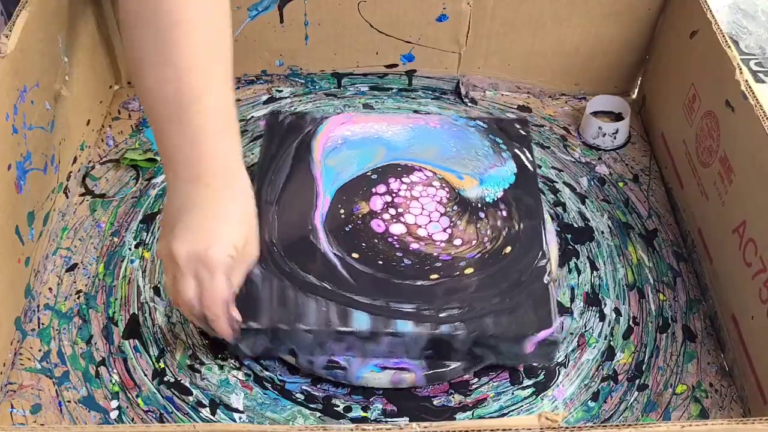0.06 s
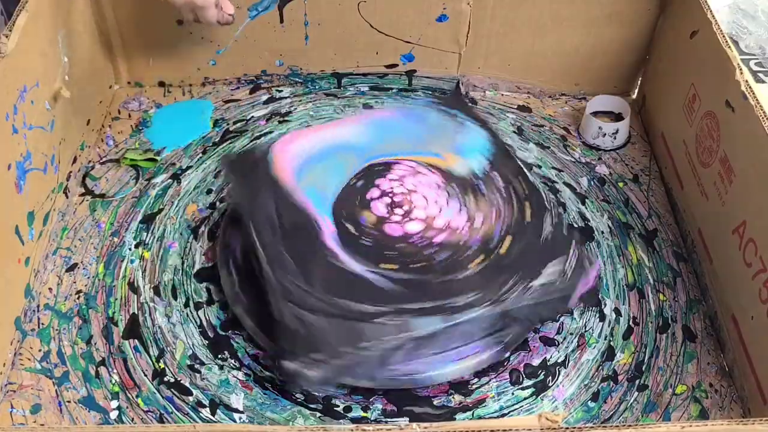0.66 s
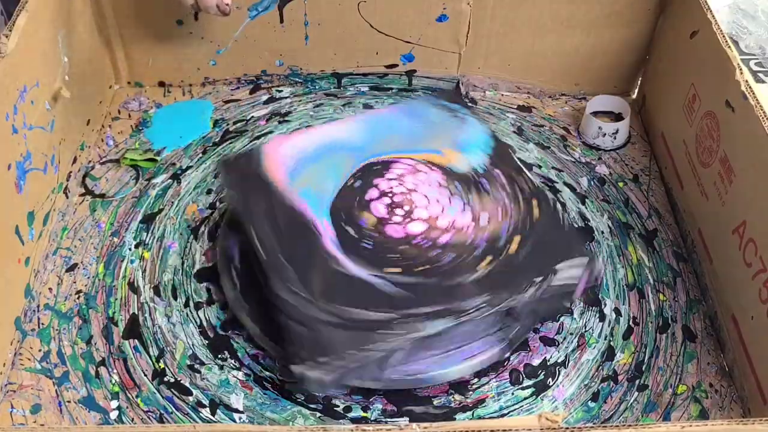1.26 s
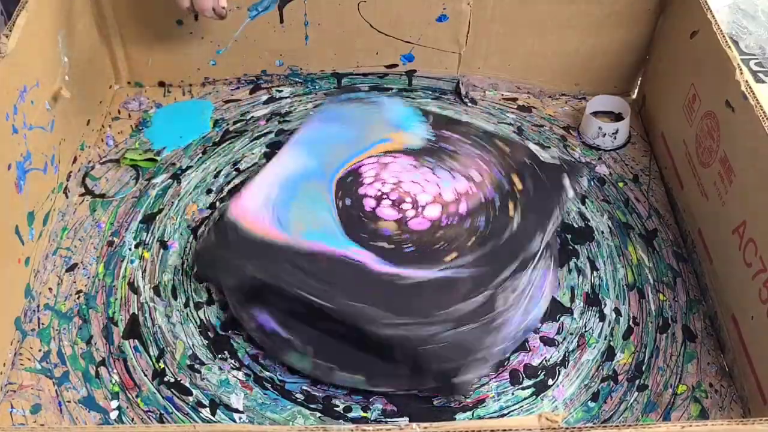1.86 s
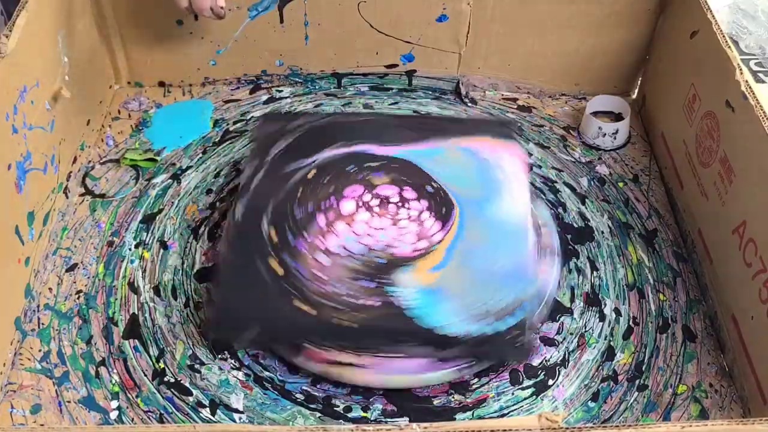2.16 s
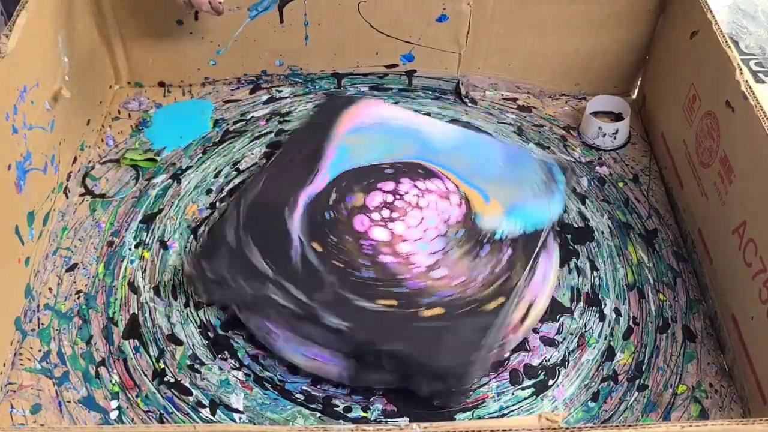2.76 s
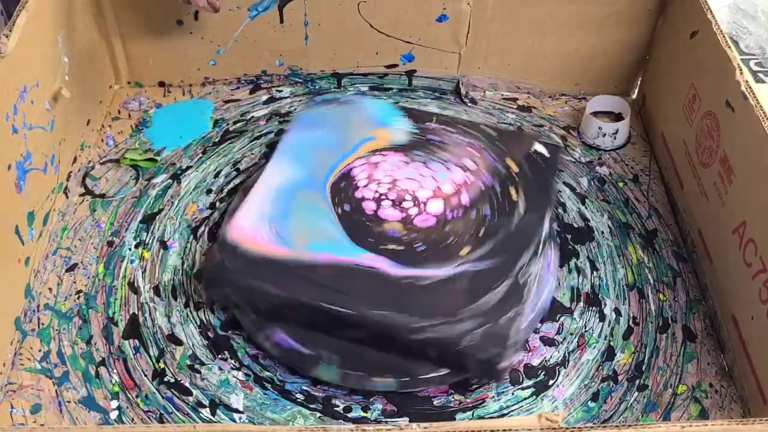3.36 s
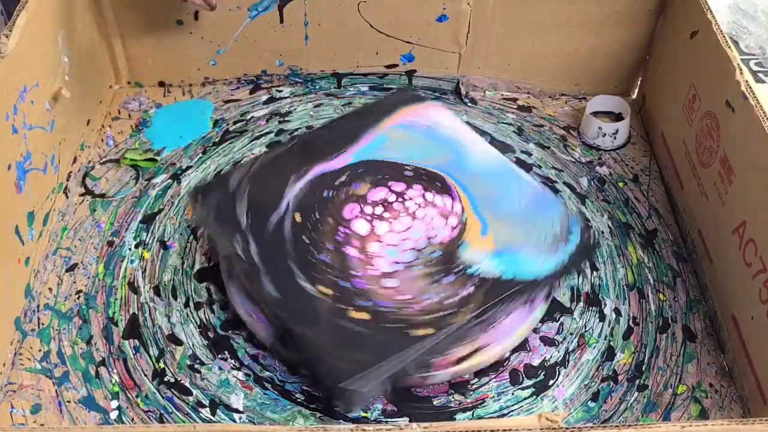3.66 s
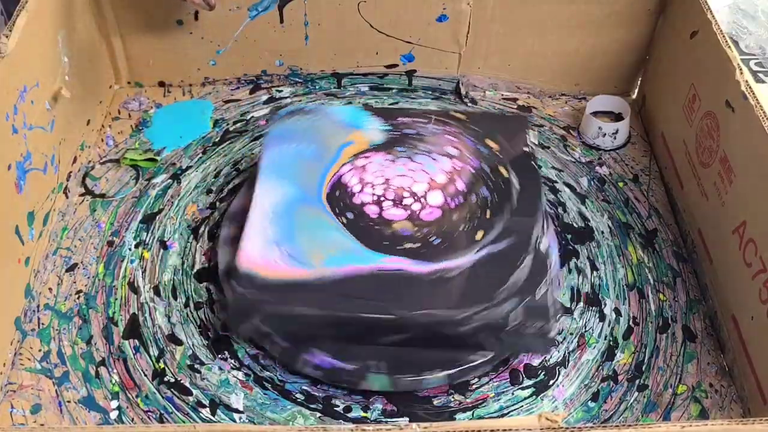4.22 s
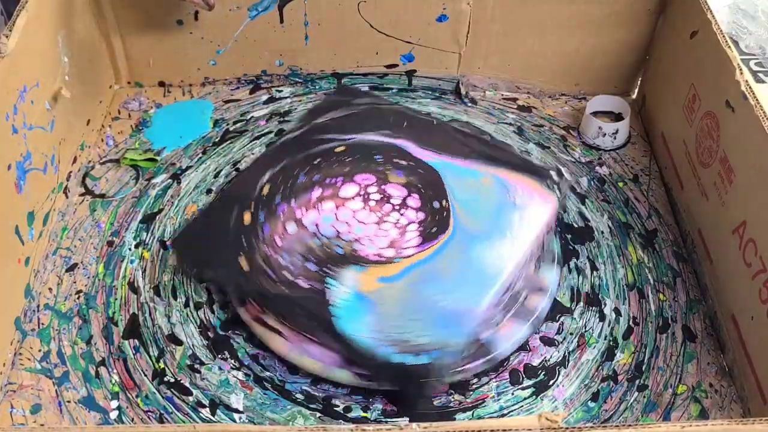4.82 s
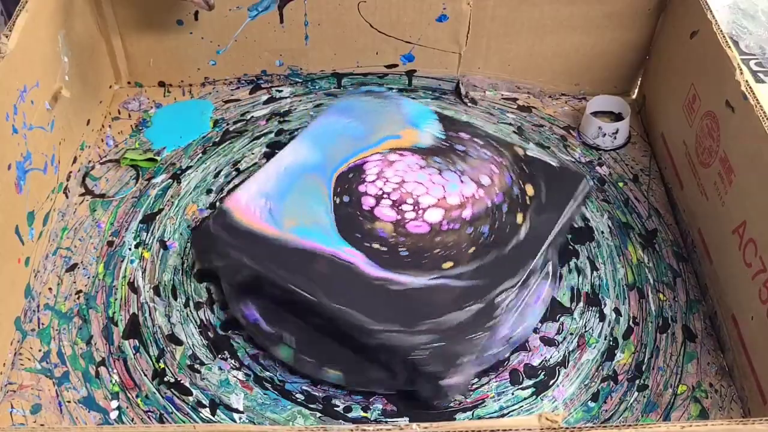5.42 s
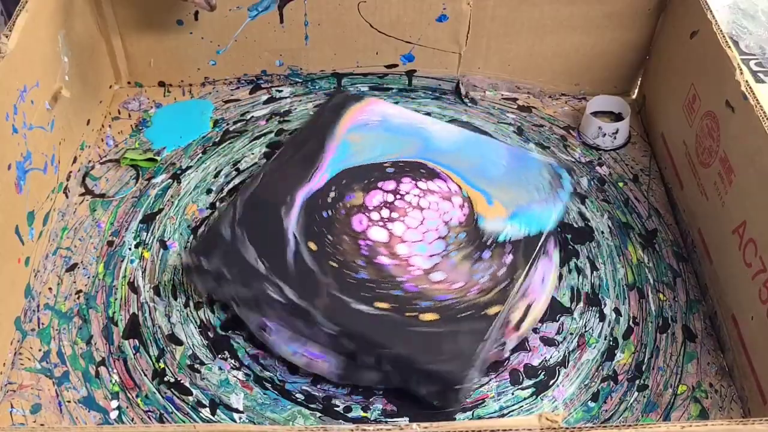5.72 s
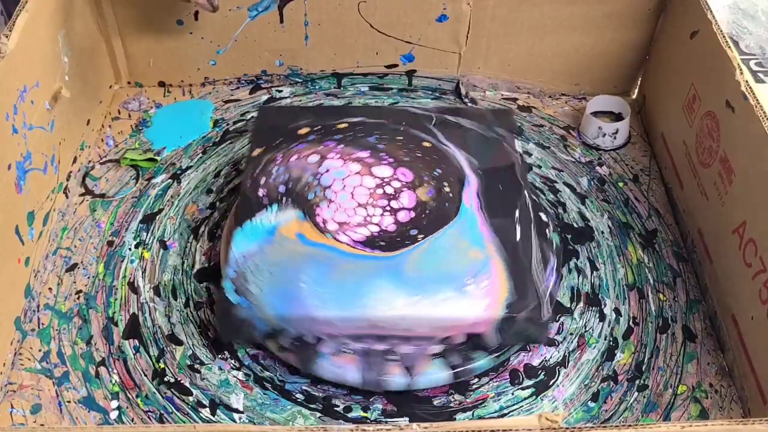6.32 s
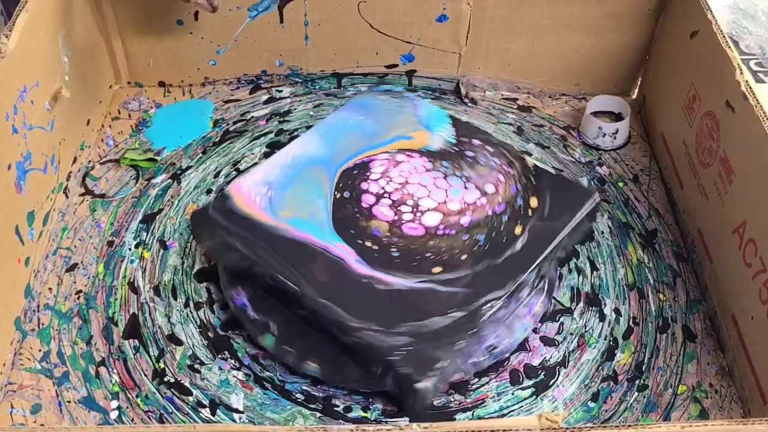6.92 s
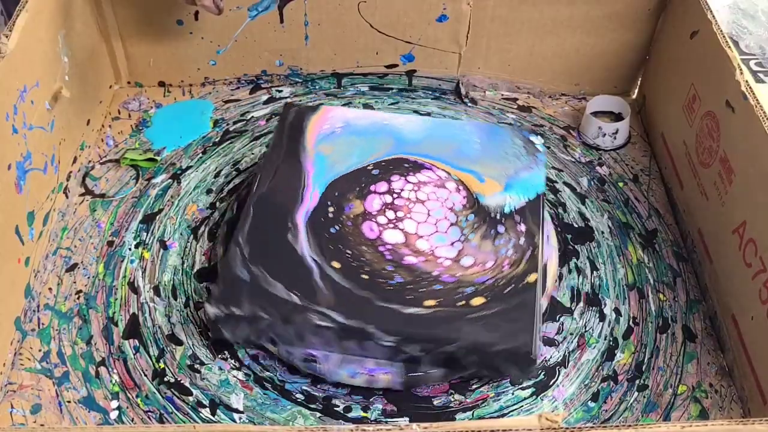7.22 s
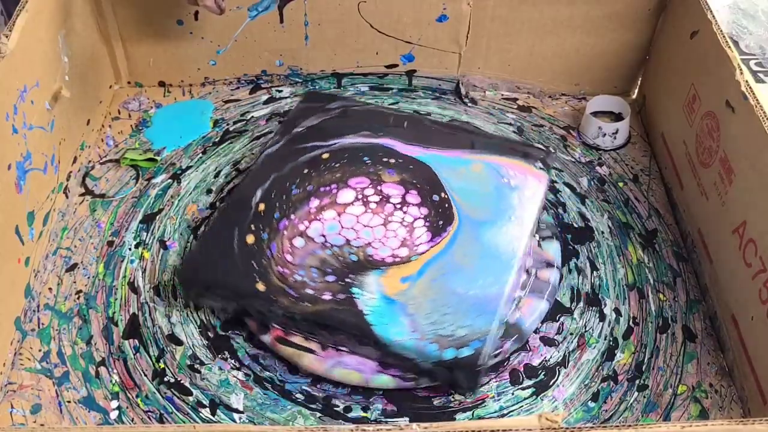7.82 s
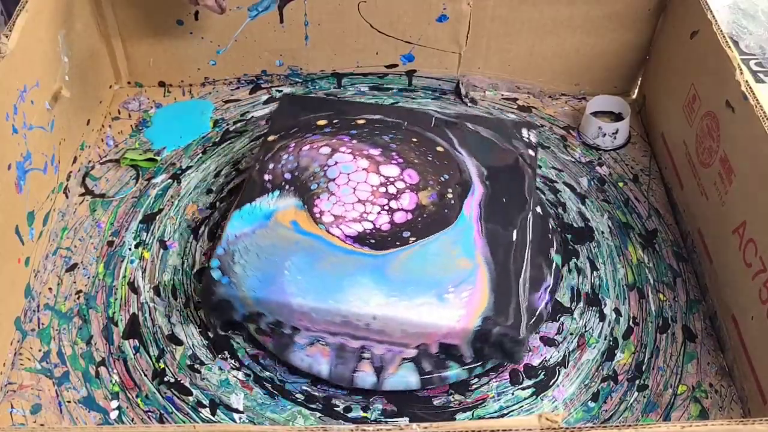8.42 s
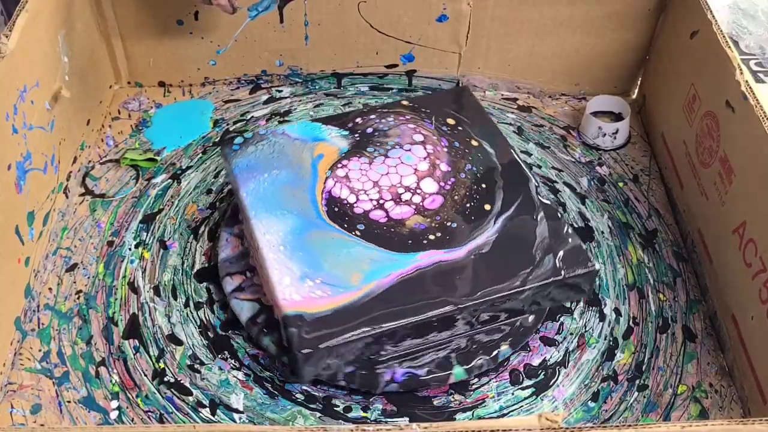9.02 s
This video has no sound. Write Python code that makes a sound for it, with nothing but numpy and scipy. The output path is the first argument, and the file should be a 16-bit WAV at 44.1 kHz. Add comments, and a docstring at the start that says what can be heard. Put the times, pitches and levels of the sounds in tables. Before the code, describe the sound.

A hand-spun turntable carrying a wet canvas whirs, knocks and rumbles inside a cardboard box, flicking paint as it gradually coasts down.

```python
"""A cardboard box in a quiet room, close to a stereo pair; inside, a turntable carries a wet canvas.
First a hand flings it round: the rough ball bearing makes the platter whir, knock, click and scrape,
the box floor rumbles and thuds, and paint flies off the edges and spatters on the cardboard.
Then it coasts down, swelling once a turn under the off-centre load. From about 6 s the slowing balls
chatter in their cage; last come a few soft, separate bearing knocks, and all fades into the room's air."""
import sys
import numpy as np
from scipy import signal
from scipy.fft import rfft, irfft
from scipy.io import wavfile
from scipy.ndimage import uniform_filter1d

SR = 44100
rng = np.random.default_rng(int(sys.argv[2]) if len(sys.argv) > 2 else 0)


def dump(signal):
    """Clip the signal to [-1, 1] and save it as 16-bit WAV at the path in sys.argv[1]."""
    limited = np.clip(np.atleast_2d(signal).T, -1, 1)
    pcm = np.round(limited * 32767).astype(np.int16)
    wavfile.write(sys.argv[1], SR, pcm)


N = 404838
TIME = np.arange(N) / SR
PUSH_S, RELEASE_S = .15, .4
TOP_TURNS_PER_S, FRICTION_TURNS_PER_S2 = 4.329, .4445
ROLL_CONTACT_HZ, BOX_CONTACT_HZ = 8700, 650   # rolling at top speed excites little above these


def spin():
    """The hand pushes, then constant friction brakes: speed as a share of the top, and turns made."""
    pushed = np.clip((TIME - PUSH_S) / (RELEASE_S - PUSH_S), .01, 1)
    turns_per_s = pushed * (TOP_TURNS_PER_S - FRICTION_TURNS_PER_S2 * np.maximum(TIME - RELEASE_S, 0))
    return turns_per_s / TOP_TURNS_PER_S, np.cumsum(turns_per_s) / SR


def spin_level(top_db, power, swing, heavy_side_turns=.65):
    """Level in dB that grows with speed and swells once a turn under the off-centre load."""
    speed, turns = spin()
    load = 1 + swing * np.cos(2 * np.pi * (turns - heavy_side_turns))
    return top_db + 20 * np.log10(speed ** power * load)


# modes of the platter and stretched canvas: f/Hz, width/Hz, level/dB
PLATTER_MODES = [(198.2, 4.7, -6), (247.5, 150, -13.5), (320.2, 18.5, -6), (357.7, 22.2, -5.5),
                 (438.5, 51.6, -4.5), (561.7, 89, -16), (626.5, 27, -17), (697, 14, -23.5), (888, 57, -20),
                 (970.4, 12.2, -13.5), (1226, 360, -23.5), (1595, 35, -23), (1670, 164, -24),
                 (1869, 49, -28.5), (1944, 180, -21.5), (2062, 415, -24.5)]
def whir(level_db, speed, contacts_per_s, split_hz=660, rattle_db=-44):
    """Rolling balls shake the platter in quick surges; slowing, they come singly and miss upper modes."""
    force = steadied(bumps(contacts_per_s, spread_db=3.5) * from_db(2.36 * drift(55)), seconds=0.11)
    low = rolled_over(force, [m for m in PLATTER_MODES if m[0] < split_hz], ROLL_CONTACT_HZ)
    upper_modes = [m for m in PLATTER_MODES if m[0] >= split_hz]
    high = rolled_over(force, upper_modes, ROLL_CONTACT_HZ * speed ** 1.34)
    rattle = rms_one(high) * from_db(rattle_db) * speed ** 1.45   # does not feel the load
    return steadied(low, seconds=0.15) * from_db(level_db) + rattle


# balls dropping over rough spots under the platter: t/s, level/dB, tilt/(dB per octave)
BALL_DROPS = [(0.398, -29, 2), (0.597, -27, 2), (0.854, -23, 6.5), (0.891, -18.5, -3.5), (1.117, -17, -1.5),
              (1.167, -23, 0.5), (1.219, -26.5, 10), (1.318, -18.5, 1), (1.574, -22.5, 1), (1.86, -24, -9),
              (1.895, -20.5, -1.5), (1.988, -25.5, 1.5), (2.138, -17, -3), (2.17, -19.5, -4.5),
              (2.422, -18, -4), (2.459, -22.5, -3), (2.515, -19.5, 1), (2.555, -24, -2), (2.7, -23.5, 3.5),
              (2.796, -24, 1.5), (3.079, -23.5, 1), (3.393, -22.5, -2.5), (3.783, -23, -5),
              (3.867, -22.5, -4), (4.112, -21, 0), (4.188, -23.5, -2.5), (4.482, -29, 2.5),
              (4.645, -28.5, -1), (4.841, -26.5, 2), (4.937, -27.5, -1), (5.243, -30, -4),
              (5.394, -24.5, -3), (5.645, -27, -1), (5.929, -23.5, -0.5), (6.087, -29, -4),
              (6.602, -32.5, 1), (7.008, -30, -2), (7.057, -31, -1.5), (7.151, -30.5, -2), (7.195, -31, -1),
              (7.289, -36.5, 0.5), (7.402, -33, -2), (7.788, -32, -1), (7.801, -38, -1), (7.987, -40, 0),
              (8.056, -39.5, -2), (8.098, -38.5, -13), (8.362, -46.5, -6), (8.741, -41, -8.5),
              (8.937, -45.5, 0.5)]
def knocks(scatter_db, thump_db, contact_hz, damping_per_s, gain_db):
    """Each drop strikes the platter's modes with strengths of its own and thumps the box floor."""
    out, rings, thump = np.zeros(N), mode_rings(PLATTER_MODES), mode_rings(FLOOR_MODES).sum(0)
    octaves, t = np.log2(np.array(PLATTER_MODES)[:, 0] / 450), TIME[:len(thump)]
    # the platter takes a cycle to get going, then the ball damps it
    swell = (1 - np.exp(-t / 0.0019)) * np.exp(-damping_per_s * t)
    for s, db, tilt in BALL_DROPS:
        ring = from_db(scatter_db * rng.standard_normal(len(rings)) + tilt * octaves) @ rings
        blow = cut(ring, contact_hz, "low") * swell + from_db(thump_db) * thump
        add(out, s, blow / np.abs(blow).max() * from_db(db + gain_db))
    return out


def lift(length_s):
    """A ball rides up a rough spot just before it drops: 0 in contact, 1 lifted."""
    ahead_s = np.array(BALL_DROPS)[:, :1] - TIME[::64]
    lifted = np.exp(-np.abs(ahead_s) / length_s) * (ahead_s > 0)
    return np.interp(TIME, TIME[::64], lifted.max(0))


# balls snapping hard against the track: t/s, level/dB, treble tilt/(dB per octave)
BALL_SNAPS = [(0.4128, -36, 2), (0.464, -29.5, -4), (0.6007, -42, 2), (0.6478, -40.5, -8),
              (0.6637, -54, -20), (0.852, -31.5, 5), (0.8705, -31, 4.5), (1.004, -42.5, 4),
              (1.092, -36.5, 4), (1.2204, -38.5, -6), (1.3196, -34, -0.5), (1.3382, -35.5, -6),
              (1.3857, -43.5, 3.5), (1.4475, -40, -2), (1.4897, -35.5, -5), (1.6036, -43.5, 6),
              (1.6505, -38, 1), (1.6733, -40.5, -5), (1.8971, -39, -14), (1.9323, -55, 12),
              (2.138, -39.5, -6), (2.1717, -39.0, -2), (2.254, -48, -11), (2.2885, -44.5, -5),
              (2.4234, -44.5, 5), (2.4578, -44, -3), (2.7017, -31.5, -9), (2.7963, -42.5, 1.5),
              (2.9132, -41, -16.5), (3.0992, -38.0, 0.5), (3.4007, -48, -21), (3.4278, -40.5, -12),
              (3.6767, -44.5, -7), (3.7807, -43, -9), (3.798, -49, -17), (3.877, -38, -10),
              (4.1125, -48.5, -5), (4.4798, -47, -4), (4.5307, -48.5, -10), (4.6896, -44.5, -18),
              (4.7481, -45, -12), (4.8412, -45, -12), (4.869, -45, -13), (4.938, -51, -4),
              (5.0815, -48, -11), (5.444, -49, -24), (5.941, -39.5, -8), (6.358, -50, -17),
              (6.526, -54, -7), (6.5754, -52, -24), (7.01, -55, -13), (7.03, -60, -19), (7.0573, -60, -11),
              (7.1498, -52, -26), (7.2033, -61.5, -28)]
def clicks(swell_s, length_s, treble_hz, mic_lag_s):
    """Each snap is a dry, broad clack of a few milliseconds, coloured by the box."""
    out, t = np.zeros((2, N)), TIME[:1024]
    swell = t ** 2 * np.exp(-(t / swell_s) ** 0.98)
    for s, db, tilt in BALL_SNAPS:
        colour = [(hz, level + tilt * max(np.log2(hz / treble_hz), 0)) for hz, level in BOX_COLOUR]
        clack = through(rng.standard_normal(len(t)) * swell, response_of(colour))
        clack *= from_db(db) * np.sqrt(length_s * SR / np.sum(clack ** 2))
        add(out, s, at_mics(clack, mic_lag_s * rng.uniform(-1, 1)))
    return out


# modes of the steel track: f/Hz, width/Hz, level/dB
TRACK_MODES = [(2856, 400, 1), (3320, 300, 1.5), (4800, 1300, -11.5), (6000, 1300, -13)]
def scrape(level_db, speed):
    """Grit under the balls keeps the track ringing, brighter at speed; each mode surges on its own."""
    ring = np.zeros(N)
    for mode in TRACK_MODES:
        grit = rolled_over(bumps(800 * speed, spread_db=4.5), [mode], ROLL_CONTACT_HZ)
        ring += grit * from_db(4.2 * drift(40)) * speed ** (0.54 * np.log2(mode[0] / 3000))
    surge_db = 2.3 * drift(25)
    return rms_one(cut(ring, 2480, "high", order=4)) * from_db(level_db + surge_db)


# modes of the ball cage: f/Hz, width/Hz, level/dB
CAGE_MODES = [(940, 54, -5), (1150, 110, 3), (1730, 210, 3), (2020, 54, 6), (3180, 450, -10.5)]
# slowing balls striking the cage: t/s, level/dB
CAGE_HITS = [(5.82, -34), (6.183, -36), (6.358, -37), (6.777, -40.5), (6.892, -43), (7.199, -39),
             (7.802, -41.5), (7.995, -40.5), (8.072, -45), (8.159, -48), (8.365, -51), (8.546, -58)]
def chatter(bounce_s, scatter_db, gain_db):
    """A loose ball bounces briefly and rings the cage's modes with strengths of its own."""
    out, rings = np.zeros(N), mode_rings(CAGE_MODES, size=1024)
    for s, db in CAGE_HITS:
        clack = through(burst(bounce_s), from_db(scatter_db * rng.standard_normal(len(rings))) @ rings)
        add(out, s, clack / np.abs(clack).max() * from_db(db + gain_db))
    return out


# modes of the loaded box floor: f/Hz, width/Hz, level/dB
FLOOR_MODES = [(35.3, 5.6, -5), (70.4, 25.4, 1), (87.9, 35.4, -1), (107.2, 11.8, -2.5), (151.3, 10.9, -5.5)]
def rumble(level_db, contacts_per_s, contact_hz):
    """The rolling drums on the box floor through the turntable's base."""
    ring = rolled_over(bumps(contacts_per_s, spread_db=3.5), FLOOR_MODES, contact_hz)
    return cut(steadied(ring, seconds=0.13), 34, "high", order=4) * from_db(level_db)


# the load rocking on the box floor: t/s, level/dB
FLOOR_THUDS = [(0.642, -30), (1.12, -24), (1.21, -21), (2.183, -23), (2.459, -23), (3.689, -26),
               (4.122, -22.5), (4.468, -24), (6.488, -32.5), (6.606, -31.5)]
def thuds(contact_hz, gain_db):
    """A soft, heavy blow rings the box floor alone."""
    out, thud = np.zeros(N), cut(mode_rings(FLOOR_MODES).sum(0), contact_hz, "low")
    for s, db in FLOOR_THUDS:
        add(out, s, thud / np.abs(thud).max() * from_db(db + gain_db))
    return out


# colour of a tick or click inside the cardboard box: f/Hz, level/dB
BOX_COLOUR = [(600, -4), (2300, -2.5), (3000, 5.5), (5000, 8), (6800, -1), (9800, -10), (10700, -31),
              (15500, -25.5)]
def spray(level_db, speed, mic_lag_s):
    """Droplets tick on the cardboard all round the box; fast ones splash brighter."""
    patter = np.zeros((2, N))
    for hz in np.geomspace(2800, 9000, 6):
        hits = through(bumps(45 * speed, spread_db=5.0), burst(spread_s=0.0013))
        band = signal.lfilter(*signal.iirpeak(hz, Q=2.4, fs=SR), hits + 1e-18)
        ticks = rms_one(band) * speed ** np.log2(hz / 3000)
        patter += at_mics(ticks, mic_lag_s * rng.uniform(-0.54, 1))
    boxed = np.array([through(channel, response_of(BOX_COLOUR)) for channel in patter])
    return steadied(boxed, seconds=0.093) * from_db(level_db + 0.99 * drift(9.4))


# strings of paint landing, centred between the microphones: t/s, length/s, level/dB
PAINT_STRINGS = [(2.41, 0.16, -59.5), (5.72, 0.34, -68)]
def streaks(droplets_per_s, spread_db):
    """A string of paint lands as a dense, gritty patter that swells and fades."""
    patter = rms_one(through(bumps(droplets_per_s, spread_db), response_of(BOX_COLOUR)))
    level = np.zeros(N)
    for s, length, db in PAINT_STRINGS:
        add(level, s, from_db(db) * np.sqrt(np.hanning(int(length * SR))))
    return patter * level


def room(pair, t60_s, wet_db, side_db, side_hz, size=16384):
    """Box walls and the room beyond add a short tail, drier on top, its paths shifting with each turn."""
    t, mono, angle = TIME[:size], pair.mean(0), 2 * np.pi * spin()[1]
    fade = from_db(-60 * t / t60_s) * (t > .002)
    tails = []
    for noise in rng.standard_normal((4, size)):
        low, high = cut(noise, 3500, "low", order=3), cut(noise, 3500, "high", order=3)
        tails.append(rms_one(low * fade + 1.25 * high * fade ** 1.5) / np.sqrt(size))
    mid, side = [through(mono * np.cos(angle), a) + through(mono * np.sin(angle), b)
                 for a, b in (tails[:2], tails[2:])]
    centre = from_db(wet_db) * cut(mid, 470, "high", order=1)
    width = from_db(side_db) * cut(side, side_hz, "high", order=1)   # long waves reach both mics alike
    return pair + np.array([centre + width, centre - width])


# spectrum of the room's still air: f/Hz, level/dB
ROOM_TONE = [(20, -3), (70, -8.5), (130, -10.5), (400, -22), (800, -29), (2000, -34), (4000, -41.5),
             (15500, -40)]
def air(level_db):
    """A faint, dark hush, different at each microphone."""
    hush = [rms_one(through(rng.standard_normal(N), response_of(ROOM_TONE))) for _ in "lr"]
    return from_db(level_db) * np.array(hush)


def at_mics(x, lead_s):
    """Stereo pair; the sound reaches the left microphone first if lead_s is positive."""
    lag = round(lead_s * SR)
    return np.array([np.roll(x, max(-lag, 0)), np.roll(x, max(lag, 0))])


def bumps(per_s, spread_db):
    """Random contacts of uneven size, rms 1 whatever their rate."""
    out, at = np.zeros(N), np.flatnonzero(rng.random(N) < per_s / SR)
    sizes = from_db(spread_db * np.minimum(rng.exponential(1, N)[at], 4))
    out[at] = sizes * np.sign(rng.random(N)[at] - .5)
    return rms_one(out / np.sqrt(per_s))


def burst(spread_s, size=2048):
    """Force of a rough contact: a quick swell of noise that soon dies."""
    t = TIME[:size]
    return rms_one(rng.standard_normal(size) * t * np.exp(-t / spread_s))


def rolled_over(force, modes, contact_hz):
    """Ring a body with the force of rolling; modes above the contact pitch are hardly reached."""
    ring = np.zeros(N)
    for k, (hz, width, db) in enumerate(modes):
        r, w = np.exp(-np.pi * width / SR), 2 * np.pi * hz / SR
        gain = (-1) ** k * from_db(db) * width * np.sin(w)
        drive = force / (1 + (hz / contact_hz) ** 2)
        ring += signal.lfilter([0, gain], [1, -2 * r * np.cos(w), r * r], drive + 1e-18)
    return ring


def mode_rings(modes, size=8192):
    """One decaying sine per mode, neighbours in opposite phase."""
    hz, width, db = np.transpose(modes)[:, :, None]
    t, sign = TIME[:size], (-1) ** np.arange(len(modes))[:, None]
    return sign * from_db(db) * width * np.exp(-np.pi * width * t) * np.sin(2 * np.pi * hz * t)


def response_of(spectrum, size=4096):
    """Causal impulse response with a given spectrum."""
    hz, db = np.transpose(spectrum)
    grid = np.linspace(1, SR / 2, size // 2 + 1)
    cepstrum = irfft(np.log(from_db(np.interp(np.log(grid), np.log(hz), db))))
    return irfft(np.exp(2 * rfft(cepstrum[:size // 2], size)))


def steadied(x, seconds):
    """Hold the running rms at 1, so that bumps even out over a short while."""
    return x / np.sqrt(np.abs(uniform_filter1d(x ** 2, int(seconds * SR))) + 1e-12)


def drift(per_s):
    """Random wander with rms 1."""
    knots = rng.standard_normal(4096)
    return rms_one(np.interp(TIME * per_s, np.arange(len(knots)), knots))


def through(x, response):
    """Pass a signal through an impulse response."""
    return signal.oaconvolve(x, response)[:N]


def cut(x, hz, kind, order=2):
    """Butterworth low- or high-pass."""
    return signal.sosfilt(signal.butter(order, hz, kind, fs=SR, output="sos"), x + 1e-18)


def add(track, s, sound):
    """Lay a sound into a track at a time."""
    start = round(s * SR)
    track[..., start:start + sound.shape[-1]] += sound[..., :N - start]


def from_db(db):
    """Decibels to gain."""
    return 10 ** (np.asarray(db) / 20)


def rms_one(x):
    """Scale to rms 1."""
    return x / np.sqrt(np.mean(x ** 2) + 1e-20)


def scene():
    """Turntable, box and flying paint up close, near the centre of the pair; the quiet room behind."""
    speed, _ = spin()   # a faster spin is louder, meets more bumps and flings more paint
    whir_db = spin_level(top_db=-30.5, power=1.963, swing=.26) - 1.3 * lift(length_s=0.0072)
    platter = whir(whir_db, speed, contacts_per_s=3200 * speed ** 1.6)
    platter += scrape(spin_level(top_db=-53, power=2.48, swing=.42), speed)
    platter += chatter(bounce_s=.005, scatter_db=5.0, gain_db=-1.5)
    platter += knocks(scatter_db=3.0, thump_db=-6.0, contact_hz=2540, damping_per_s=61, gain_db=0.5)
    rocking = np.clip((TIME - PUSH_S) / 0.37, 0, 1)   # the hand steadies the load at first
    rumble_db = spin_level(top_db=-29, power=1.616, swing=.38)
    box = rocking * rumble(rumble_db, contacts_per_s=2500 * speed, contact_hz=BOX_CONTACT_HZ * speed)
    turntable = at_mics(platter + box + thuds(contact_hz=112, gain_db=2.5), lead_s=.00007)
    turntable += clicks(swell_s=0.0013, length_s=0.0063, treble_hz=3100, mic_lag_s=.00013)
    paint = rocking * spray(spin_level(top_db=-53.5, power=3.1, swing=.42), speed, mic_lag_s=.0002)
    paint += streaks(droplets_per_s=2000, spread_db=4.5)
    return air(level_db=-65) + room(turntable + paint, t60_s=0.31, wet_db=-3.0, side_db=-3.5, side_hz=760)


def record(dry):
    """The top is cut steeply above 15.6 kHz."""
    return signal.sosfilt(signal.ellip(10, .1, 80, 15600, fs=SR, output="sos"), dry)


dry = scene()
out = record(dry)
dump(out)
```